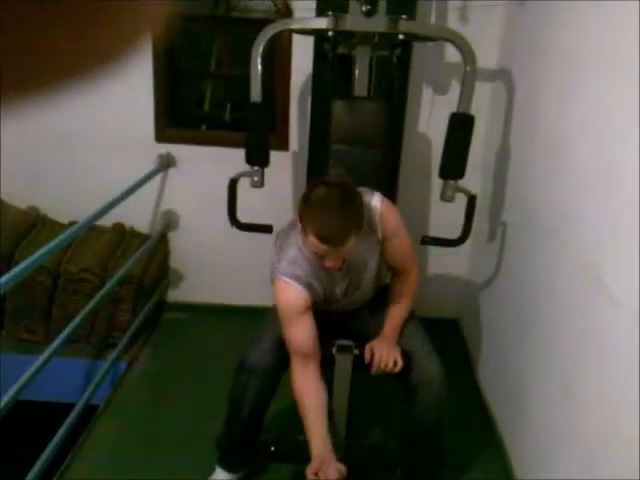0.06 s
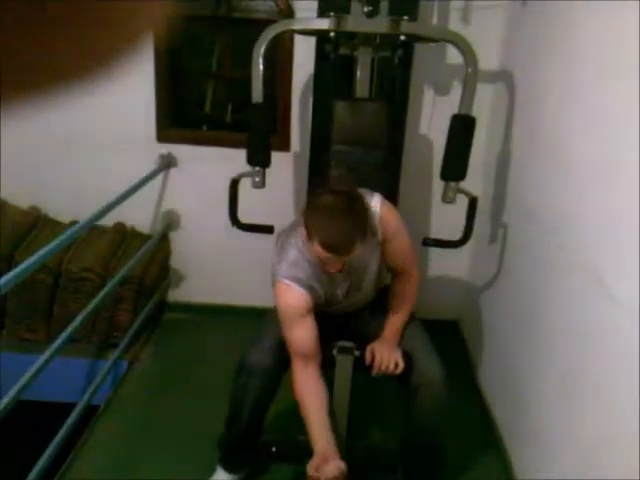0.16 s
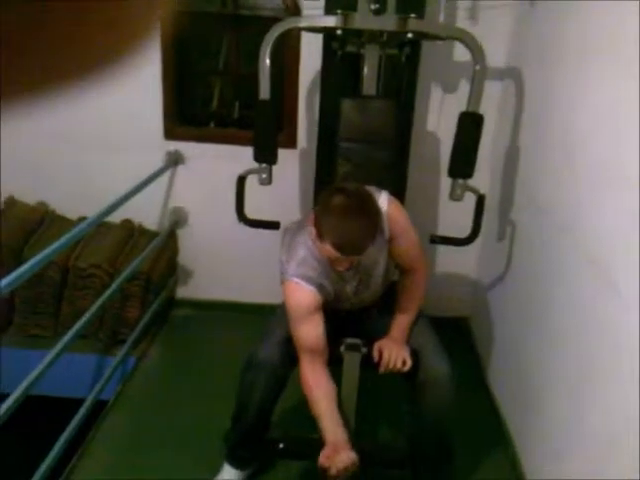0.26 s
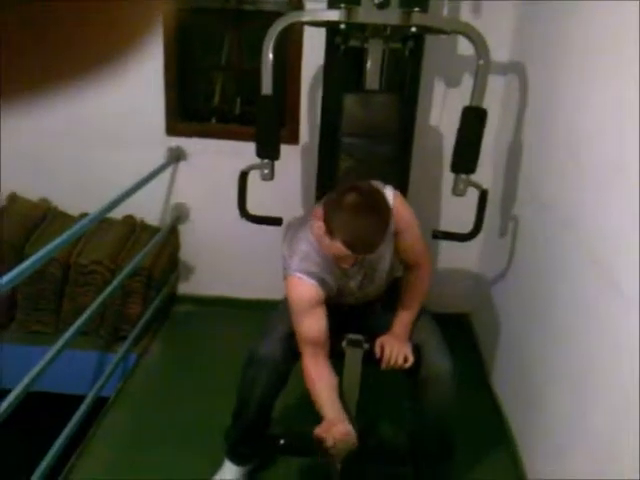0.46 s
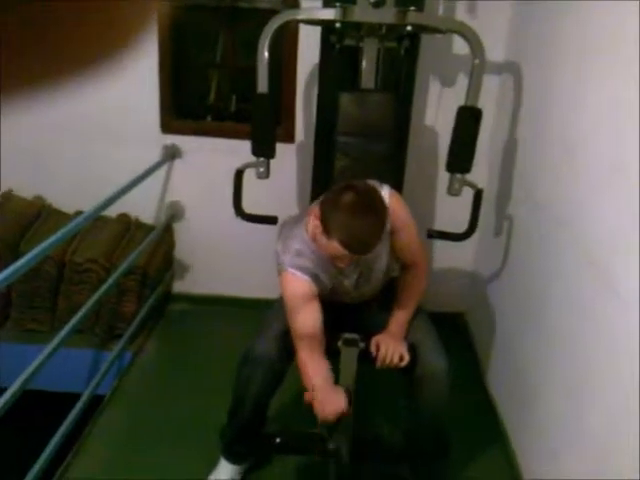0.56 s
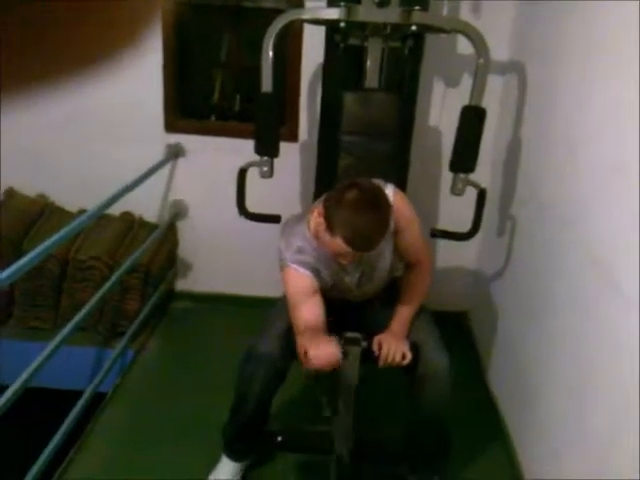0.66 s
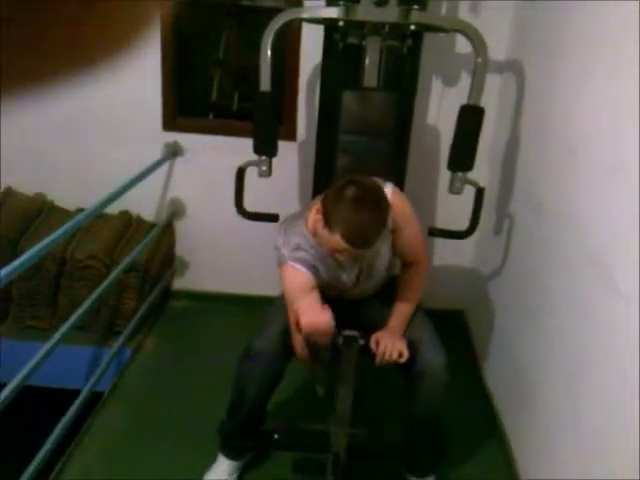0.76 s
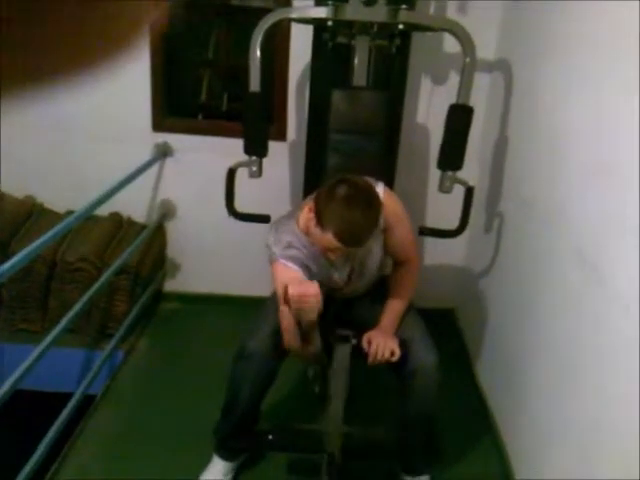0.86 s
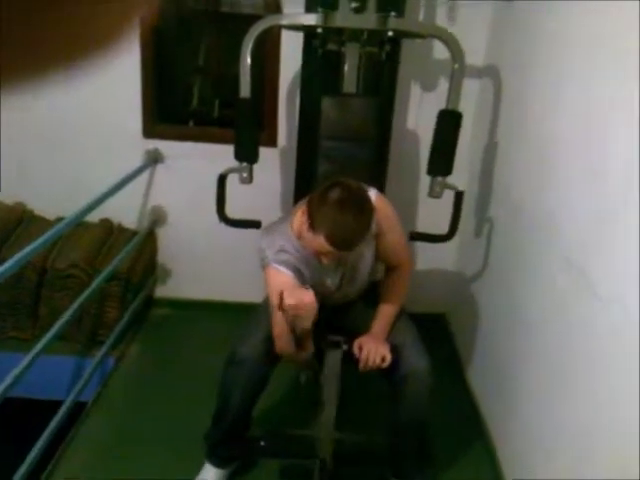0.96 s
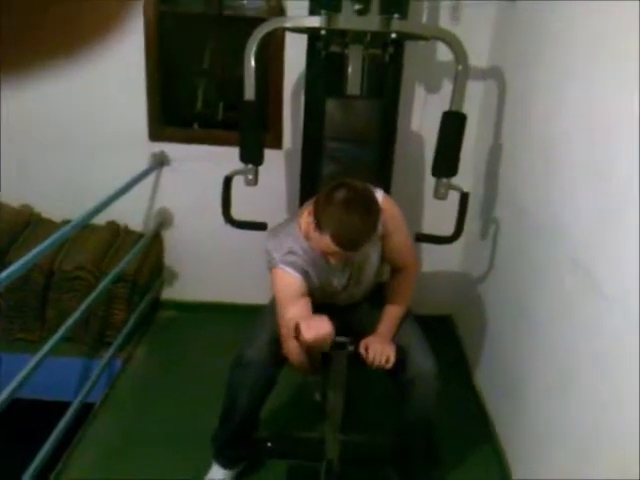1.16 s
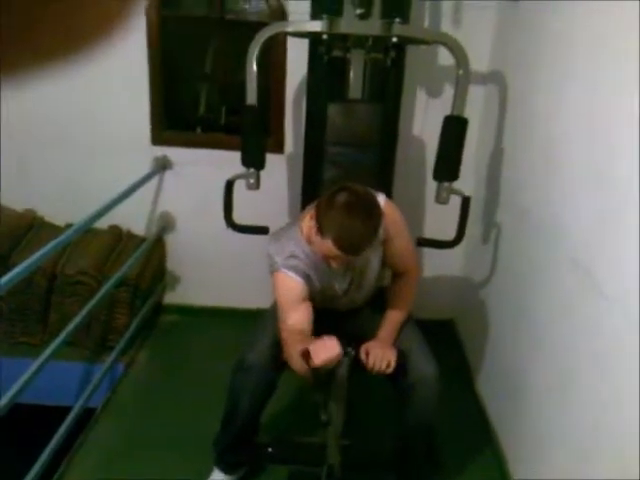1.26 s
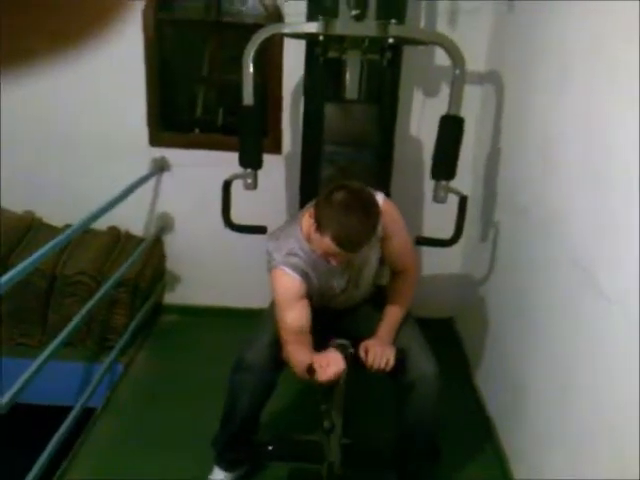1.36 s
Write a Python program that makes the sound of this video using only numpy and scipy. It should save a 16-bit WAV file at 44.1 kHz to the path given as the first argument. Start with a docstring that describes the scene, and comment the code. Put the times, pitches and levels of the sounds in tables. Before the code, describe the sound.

A weight machine clanks once, then its pulley and cable whirr through a pull.

```python
"""A home gym in a small bare room, where an arm curls a weight on a cable machine.
The weight plates knock and settle, the steel clanks as the cable takes the load, and the frame thuds.
During the curl the stack of weights rubs up its guide rods, a pulley whirrs from friction,
and the tight cable sings on one pitch. Near the top of the pull the axle squeaks twice.
A faint hiss and hum lie under it all."""
import sys
import numpy as np
from scipy import signal
from scipy.fft import rfft, irfft, next_fast_len
from scipy.io import wavfile

SR = 44100
rng = np.random.default_rng(int(sys.argv[2]) if len(sys.argv) > 2 else 0)


def put_to_file(sound):
    """Save the sound as 16-bit audio at rate SR, in the file named by the first command-line argument."""
    columns = np.atleast_2d(sound).T  # one column per channel
    safe = np.clip(columns, -1, 1)
    whole_steps = np.round(safe * 32767)
    wavfile.write(sys.argv[1], SR, whole_steps.astype(np.int16))


N = 61739
T = np.arange(N) / SR

# tone colour of the room's hiss (frequency [Hz], relative level [dB])
HISS_COLOUR = [(15, -92.5), (25, -25), (200, -4.5), (237, -13), (273, -1), (347, -18), (391, -7.5),
               (421, -12), (588, -10.5), (1070, -17.5), (1770, -21.5), (5060, -27.5), (7600, -47),
               (9880, -78.5), (16700, -120)]
# how loudly the stack rubs on its rods (time [s], level [dB])
RUB_LEVELS = [(0, -61.5), (.2, -69), (.42, -52), (.5, -47), (.59, -45), (.665, -43), (.7, -45.5),
              (.755, -43), (.812, -49), (.838, -40.5), (.865, -48), (.9, -52), (.98, -70), (1.1, -64.5),
              (1.4, -53.5)]
# tone colour of that rubbing (frequency [Hz], relative level [dB])
RUB_COLOUR = [(300, -12), (1000, -16.5), (2000, -10), (2600, -8.5), (3300, -8), (3900, -1.5), (4300, 2),
              (5100, -2.5), (5700, -10.5), (6100, -6), (6800, -14), (7550, -40.5), (7850, -59.5)]
# how loudly the pulley whirrs (time [s], level [dB])
WHIRR_LEVELS = [(0, -68.5), (.4, -51), (.58, -60), (.7, -49.5), (.84, -48.5), (.92, -49), (1, -51.5),
                (1.1, -48.5), (1.18, -47.5), (1.26, -45.5), (1.33, -44.5), (1.4, -44.5)]
# tone colour of the whirr (frequency [Hz], relative level [dB])
WHIRR_COLOUR = [(150, -17.5), (350, -6), (600, -7.5), (950, 4), (1450, -0.5), (2000, 1.5), (2600, -5),
                (3050, -5.5), (3500, -10), (4200, -2), (4800, 2.5), (5300, 1.5), (5800, -4.5), (6700, -5),
                (7100, -13), (7550, -36.5), (7850, -61)]
# notes at which the wheel and its bracket ring (frequency [Hz], width [Hz], relative level [dB])
WHEEL_NOTES = [(934, 22, -2), (1065, 30, -4), (1582, 16, -7), (1895, 25, -7), (2030, 10, -1),
               (2076, 16, -6), (2304, 14, -10), (2468, 18, -9), (2760, 22, -10), (3060, 18, -8),
               (4200, 30, -9), (4680, 30, -5), (4890, 22, -5), (5180, 35, -5)]
# knocks of the weight plates (time [s], relative level [dB])
PLATE_KNOCKS = [(0.1138, -23.5), (0.2002, -19), (0.2204, -15.5), (0.374, 0.5), (0.3794, 2), (0.4108, -7),
                (0.6602, -6)]
# tone colour of a knock (frequency [Hz], relative level [dB])
PLATE_COLOUR = [(200, -18), (700, -11.5), (1200, -11.5), (2400, -10.5), (3100, -1.5), (4200, 0),
                (5200, 8.5), (5800, -8.5), (6400, -2), (7000, -8), (7600, -39), (7900, -62.5)]
# how long frame and room ring together (frequency [Hz], time to fade by 60 dB [s])
FADE_TIMES = [(150, 0.39), (600, 0.58), (1500, 0.61), (3500, 0.41), (6500, 0.33)]
# the cable's main tone, at three times its base pitch (time [s], level [dB])
SING_LEVELS = [(.12, -74.5), (.36, -54.5), (.47, -54.5), (.55, -49.5), (.605, -48), (.652, -59),
               (.708, -46), (.78, -45.5), (.85, -48), (.9, -52), (.99, -51), (1.018, -58), (1.06, -47.5),
               (1.138, -51), (1.222, -43), (1.3, -53.5), (1.4, -52)]
# the cable's weaker tones (multiple of the base pitch, level relative to the whirr [dB])
WEAK_TONES = [(1, -12.5), (4, -12), (5, -17), (6, -11)]
# the quick blows that make up one clank (time [s], relative level [dB])
CLANK_BLOWS = [(0.2443, -14), (.2492, 1.5), (0.2546, -7.5)]
# tone colour of the frame's clang (frequency [Hz], relative level [dB])
CLANG_COLOUR = [(88, -56.5), (150, -13.5), (325, -29), (408, -15), (750, -9), (913, -17.5), (1350, -14),
                (1600, -6), (2660, -14), (3030, -1.5), (5120, -6), (5750, -7.5), (6450, 2), (6890, -6.5),
                (7600, -35.5), (9880, -46.5), (16700, -120)]
# notes at which the steel rings (frequency [Hz], relative level [dB], time to fade by 60 dB [s])
STEEL_NOTES = [(745, -9, .45), (1650, -9, .4), (3013, 0, .42), (3064, -3.5, .4), (3210, -4.5, .48),
               (3498, -4, .35), (3608, -4, .38), (3676, -4.5, .42), (3832, -5.5, .42), (4229, -8, .5),
               (6187, -2, .38), (6271, 1, .38), (6456, -5, .48), (6660, -1.5, .46)]
# tone colour of the frame's thud (frequency [Hz], relative level [dB])
THUD_COLOUR = [(60, -31), (105, -16.5), (145, 3.5), (190, -14), (260, -10), (420, -5.5), (800, -21),
               (1500, -38.5)]
# squeaks of the axle (middle time [s], pitch [Hz], level [dB])
AXLE_SQUEAKS = [(1.185, 4660, -50.5), (1.315, 4890, -53)]


def amp(db):
    """Turns decibels into a number to multiply a sound by."""
    return 10 ** (np.asarray(db) / 20)


def unit(x):
    """Scales a signal to an average size (rms) of 1."""
    return x / np.sqrt(np.mean(x ** 2) + 1e-20)


def look_up(points, hz):
    """Reads between a table's rows, with octaves evenly spaced."""
    f, value = np.transpose(points)
    return np.interp(np.log(hz + 1), np.log(f + 1), value)


def level(curve):
    """Joins (time, level) points into a smooth volume curve."""
    return amp(np.interp(T, *np.transpose(curve)))


def add(mix, s, sound):
    """Mixes a sound in, starting at s seconds."""
    part = mix[max(round(s * SR), 0):][:len(sound)]
    part += sound[:len(part)]


def colour(x, points):
    """Gives a sound a tone colour, at an average size of 1."""
    hz = np.fft.rfftfreq(len(x), 1 / SR)
    return unit(irfft(rfft(x) * amp(look_up(points, hz)), len(x)))


def noise(points):
    """Steady noise with the given tone colour."""
    return colour(rng.standard_normal(next_fast_len(N)), points)[:N]


def wander(hz):
    """A random wobble, up to about hz times a second."""
    size = next_fast_len(2 * N)
    f = np.fft.rfftfreq(size, 1 / SR)
    return unit(irfft(rfft(rng.standard_normal(size)) * np.exp(-(f / hz) ** 2), size)[:N])


def fade(t60):
    """A volume curve that falls by 60 dB every t60 seconds."""
    return np.exp(-np.log(1000) * T / t60)


def tail(points):
    """Ringing that lingers in the room, each frequency fading at its own speed."""
    hz, t, bands = signal.stft(noise(points), SR, nperseg=256)
    fades = np.exp(-np.log(1000) * t / look_up(FADE_TIMES, hz)[:, None])
    return signal.istft(bands * fades, SR, nperseg=256)[1][:N]


def burst(points, envelope):
    """A puff of noise passed through an object with the given tone colour."""
    size = next_fast_len(2 * N)
    log_gain = np.log(amp(look_up(points, abs(np.fft.fftfreq(size, 1 / SR)))))
    body = np.exp(np.conj(signal.hilbert(log_gain)))[:size // 2 + 1]  # rings only after it is hit
    body /= np.sqrt(np.mean(abs(body) ** 2))
    puff = rng.standard_normal(N) * envelope
    return irfft(rfft(puff, size) * body, size)[:N]


def low_cut(x, hz):
    """Removes the bass below hz."""
    return signal.sosfilt(signal.butter(4, hz, "high", fs=SR, output="sos"), x)


def in_room(x, echo_db=-1.5):
    """Adds many quick echoes from the bare walls."""
    echoes = np.zeros(len(x))
    echoes[:N] = rng.standard_normal(N) * fade(t60=0.37)
    echoes /= np.linalg.norm(echoes)
    return irfft(rfft(x) * (1 + amp(echo_db) * rfft(echoes)), len(x))


def room_tone(hiss_db=-58, hum_db=-70, hum_hz=277):
    """A faint hiss and a wavering hum."""
    hiss = amp(hiss_db) * noise(HISS_COLOUR)
    hum = amp(hum_db) * (1 + .5 * wander(hz=8)) * np.sin(2 * np.pi * hum_hz * T)
    return hiss + hum


def slips(per_second=2500, spread_db=0.5):
    """Rubbing surfaces catch and let go, making tiny uneven clicks that echo in the room."""
    size = next_fast_len(N)
    strength = amp(spread_db * np.minimum(rng.exponential(1, size), 4))
    direction = rng.choice([-1, 1], size)
    slipping = rng.random(size) < per_second / SR
    return in_room(strength * direction * slipping)


def rod_rub():
    """The stack scrapes along its guide rods."""
    return level(RUB_LEVELS) * colour(slips(), RUB_COLOUR)[:N]


def pulley_whirr(ring_db=-6):
    """Friction in the pulley makes a broad whirr and sets the wheel ringing."""
    friction = slips()
    f = np.fft.rfftfreq(len(friction), 1 / SR)
    wheel = sum(amp(db) / np.sqrt(width) / (1 + 1j * (f - hz) / width) ** 2
                for hz, width, db in WHEEL_NOTES)
    ring = unit(irfft(rfft(friction) * wheel, len(friction)))
    whirr = colour(slips(), WHIRR_COLOUR)
    return level(WHIRR_LEVELS) * (whirr + amp(ring_db) * ring)[:N]


def plate_knocks(tap_db=-29.5, tail_db=-40.5):
    """The plates tap each other, and each tap rings on softly."""
    out = np.zeros(N)
    for s, db in PLATE_KNOCKS:
        tap = amp(tap_db) * burst(PLATE_COLOUR, fade(t60=0.032))
        add(out, s, amp(db) * (tap + amp(tail_db) * tail(PLATE_COLOUR)))
    return out


def cable_song(base_hz=329.7, pitch_wobble=0.0019):
    """The rubbed cable sings like a bowed string, mostly at three times its base pitch."""
    cycles = np.cumsum(base_hz * (1 + pitch_wobble * wander(hz=35))) / SR
    main = (1 + 0.06 * wander(hz=35)) * np.sin(2 * np.pi * 3 * cycles)
    weak = np.zeros(N)
    for multiple, db in WEAK_TONES:
        flutter = 1 + 0.22 * wander(hz=18)
        weak += amp(db) * flutter * np.sin(2 * np.pi * (multiple * cycles + rng.random()))
    return np.sqrt(2) * (level(SING_LEVELS) * main + level(WHIRR_LEVELS) * weak)


def steel_clank(crack_db=-14, clang_db=-23.5, ring_db=-34, rise_s=0.0012):
    """Steel hits steel: each blow cracks and clangs, and the hardest sets clear notes ringing."""
    out = np.zeros(N)
    rise = 1 - np.exp(-T / rise_s)
    for s, db in CLANK_BLOWS:
        crack = amp(crack_db) * burst(CLANG_COLOUR, fade(t60=0.017))
        clang = amp(clang_db) * rise * tail(CLANG_COLOUR)
        add(out, s, amp(db) * (crack + clang))
    ring = sum(amp(db) * fade(t60) * np.sin(2 * np.pi * (hz * T + rng.random()))
               for hz, db, t60 in STEEL_NOTES)
    hardest_s = max(CLANK_BLOWS, key=lambda blow: blow[1])[0]
    add(out, hardest_s, amp(ring_db) * rise * ring)
    return low_cut(out, hz=200)


def frame_thud(start_s=0.35, db=-47, rise_s=.005):
    """The frame gives one dull thud as the stack lifts."""
    out = np.zeros(N)
    envelope = np.minimum(T / rise_s, 1) * fade(t60=0.52)
    add(out, start_s, amp(db) * burst(THUD_COLOUR, envelope))
    return out


def axle_squeaks(half_length_s=.045, climb_hz_per_s=600, wobble_hz=14):
    """The axle squeaks near the top of the pull, creeping up in pitch."""
    out = np.zeros(N)
    for s, pitch, db in AXLE_SQUEAKS:
        hz = pitch + climb_hz_per_s * (T - s) + wobble_hz * wander(hz=80)
        swell = np.exp(-((T - s) / half_length_s) ** 2)
        out += amp(db) * swell * np.sin(2 * np.pi * np.cumsum(hz) / SR)
    return out


def scene():
    """All the sounds together, the same on the left and the right."""
    mix = room_tone() + rod_rub() + pulley_whirr() + plate_knocks()
    mix += cable_song() + steel_clank() + frame_thud() + axle_squeaks()
    return np.tile(mix, (2, 1))


def record(dry, lowest_hz=68, highest_hz=7900):
    """Trims away the deepest bass and the highest treble."""
    treble_cut = signal.firwin(301, highest_hz, window=("kaiser", 8), fs=SR)
    return signal.oaconvolve(low_cut(dry, lowest_hz), treble_cut[None], "same")


dry = scene()
out = record(dry)
put_to_file(out)
```